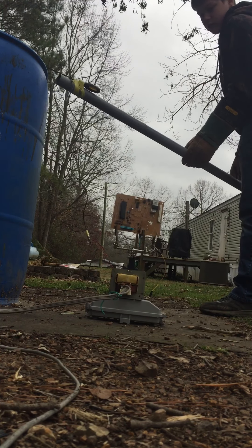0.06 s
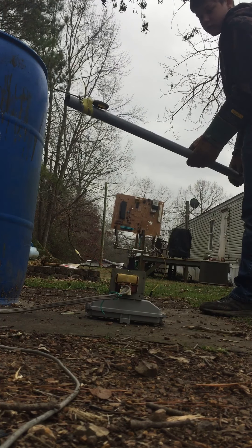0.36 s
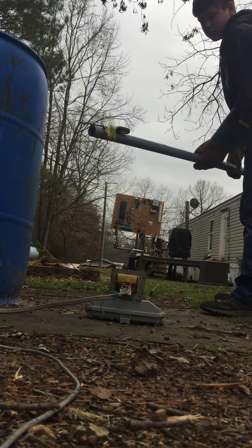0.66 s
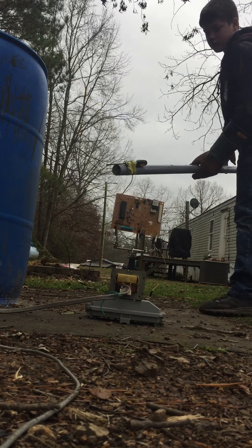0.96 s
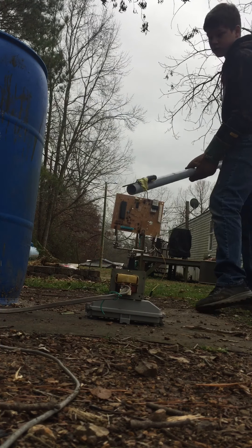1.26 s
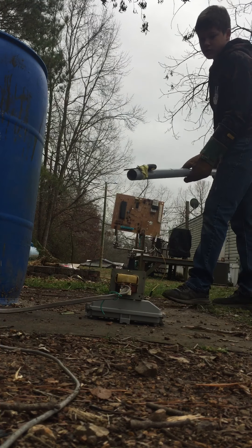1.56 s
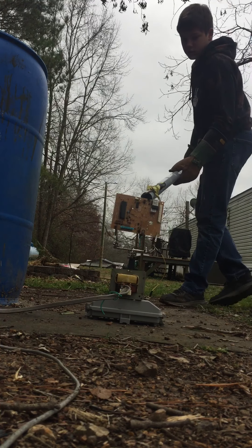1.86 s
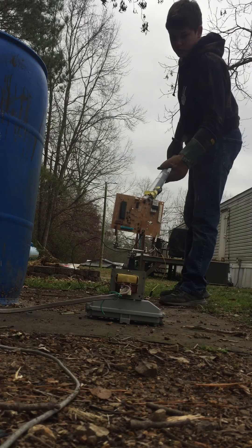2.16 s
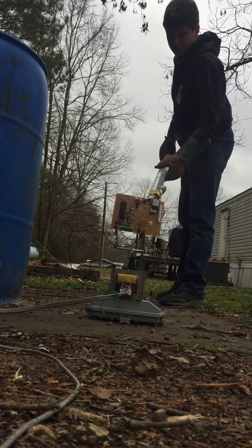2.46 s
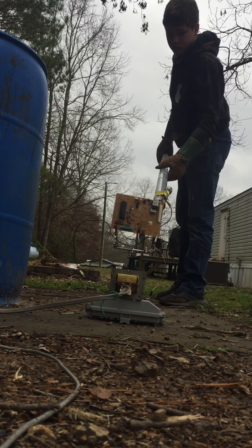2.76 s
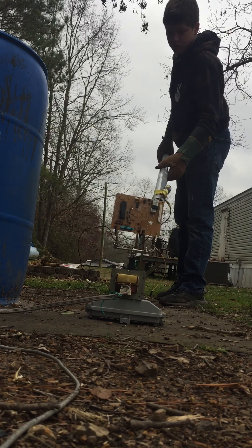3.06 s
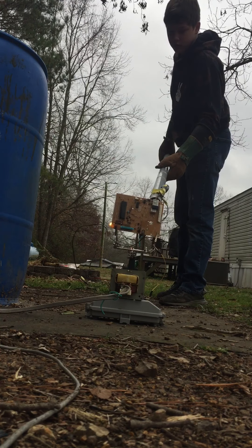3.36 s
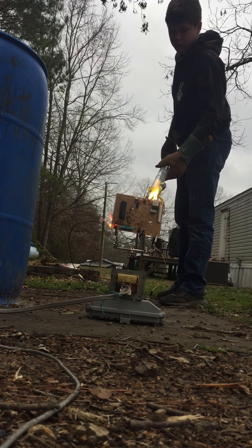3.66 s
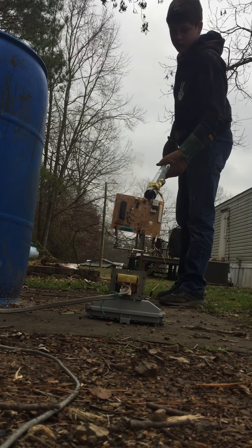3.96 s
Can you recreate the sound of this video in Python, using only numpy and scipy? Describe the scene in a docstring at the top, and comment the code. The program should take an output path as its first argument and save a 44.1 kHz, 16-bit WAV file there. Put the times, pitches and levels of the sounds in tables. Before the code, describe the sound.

A high-voltage arc snaps, sputters and grows into a harsh buzz on a circuit board near the end. Before it, a pole clacks and shoes softly knock and scuff nearby, outdoors over a faint transformer hum.

```python
"""A mains arc snaps, sputters and grows between a high-voltage electrode and a circuit board, outdoors.
It restrikes every half cycle: sudden heating radiates a crack, a push of air and a pop, the pop being
harder on one polarity. Before contact, the pole carrying the electrode clacks, shoes knock and scuff
the ground, and something twitters far off. A transformer hums throughout over a low rumble,
and the yard returns quick reflections of the nearby sounds."""
import sys
import numpy as np
from scipy import signal
from scipy.fft import rfft, irfft
from scipy.io import wavfile
from scipy.ndimage import uniform_filter1d

SR = 44100
rng = np.random.default_rng(int(sys.argv[2]) if len(sys.argv) > 2 else 0)


def to_wav(sig):
    """Store sig (one row per channel, or 1-D mono) as 16-bit WAV at the path in sys.argv[1].

    Samples outside -1..1 are clipped; the rate is SR.
    """
    pcm = np.clip(np.atleast_2d(sig), -1, 1) * 32767
    pcm = np.round(pcm).astype(np.int16)
    wavfile.write(sys.argv[1], SR, pcm.T)  # frames by channels


N = 176400
MAINS_HZ, CONTACT_S = 59.9, 3.392
HALF_CYCLE_SAMPLES = SR / (2 * MAINS_HZ)

def undb(db):
    """Amplitude ratio of a level in decibels."""
    return 10 ** (np.asarray(db) / 20)

def envelope(rows, t):
    """Amplitude interpolated in decibels; zero until just before contact."""
    return undb(np.interp(t, *np.array(rows).T)) * (t >= CONTACT_S - .001)

def colour(x, spectrum):
    """Minimum-phase filter of unit energy: the spectrum sets relative levels only."""
    hz, db = np.array(spectrum).T
    f = np.maximum(np.arange(N + 1) * SR / (2 * N), 1)
    cepstrum = irfft(np.log(undb(np.interp(np.log(f), np.log(hz), db))))
    cepstrum[1:N] *= 2  # folding onto positive time makes the filter causal
    cepstrum[N + 1:] = 0
    response = np.exp(rfft(cepstrum))
    return irfft(rfft(x, 2 * N) * response / np.sqrt(np.mean(abs(response) ** 2)))[:N]

def resonance(x, hz, q):
    """Two equal resonators in cascade, scaled to conserve the power of white noise."""
    b, a = signal.iirpeak(hz, q, fs=SR)
    return signal.lfilter(b, a, signal.lfilter(b, a, x)) / np.sqrt(b[0] / 2)

def noise():
    """Gaussian white noise."""
    return rng.standard_normal(N)

def drift(rate_hz):
    """Slow random fluctuation of unit standard deviation."""
    hold = int(SR / rate_hz)
    x = uniform_filter1d(np.repeat(rng.standard_normal(N // hold + 1), hold), hold)[:N]
    return x / x.std()

def grains(per_s, spread_db):
    """Shot noise: random impulses of log-normal size, rms 1."""
    x = (rng.random(N) < per_s / SR) * np.sign(noise()) * undb(spread_db * noise())
    return x / x.std()

def impulses(times, sizes):
    """One impulse at each time."""
    return np.bincount(np.round(times * SR).astype(int), sizes, N)[:N]

# spectra of the distant rumble and the open air (f/Hz, level/dB)
RUMBLE_SPECTRUM = [(20, -24), (65, 9), (100, 4.5), (130, 0), (165, -14.5), (300, -13), (1500, -75)]
AIR_SPECTRUM = [(100, -3), (900, 4), (1600, -4), (4000, -9.5), (8000, -15.5), (13000, -18.5), (16000, -21)]
def ambience():
    """Ambient noise: an amplitude-modulated rumble under steady, faint air."""
    rumble = colour(noise() * undb(4 * drift(rate_hz=11)), RUMBLE_SPECTRUM)
    return undb(-59) * rumble + undb(-67) * colour(noise(), AIR_SPECTRUM)

# partials of the hum (harmonic number, level/dB)
HUM_PARTIALS = [(2, -61), (4, -62.5), (6, -63)]
def transformer(t, drop_s=3.17, drop_db=-5.5):
    """Even harmonics of the mains; the level wavers and steps down shortly before contact."""
    hum = sum(undb(db) * np.sin(2 * np.pi * (k * MAINS_HZ * t + rng.random())) for k, db in HUM_PARTIALS)
    return hum * undb(.5 * drift(rate_hz=2.02) + drop_db * (t > drop_s))

# distant phrases (start t/s, end t/s, level/dB)
PHRASES = [(0.593, 0.93, -78.5), (1.76, 1.97, -74)]
def twitter(t):
    """Narrow-band noise under arched envelopes, heard as far-off birds."""
    arches = sum(undb(db) * 2 * np.sqrt(np.maximum((t - start) * (end - t), 0)) / (end - start)
                 for start, end, db in PHRASES)
    return arches * resonance(noise(), hz=4480, q=5)

# spectrum of the reflections (f/Hz, level/dB)
YARD_SPECTRUM = [(150, -29.5), (800, 4.5), (15000, -2)]
def yard(x, t, delay_s=0.0045, t60_s=0.22):
    """Reverberation: direct sound plus sparse, decaying reflections from a barrel, a wall and trees."""
    tail = grains(per_s=3700, spread_db=6) * (t > delay_s) * undb(-60 * t / t60_s)
    reflected = signal.fftconvolve(x, tail / np.linalg.norm(tail))[:N]
    return x + undb(-13.5) * colour(reflected, YARD_SPECTRUM)

# hollow knocks of shoes and pole (t/s, level/dB, f/Hz)
HOLLOW_KNOCKS = [(.721, -49.5, 704), (.859, -48, 643), (.939, -54.5, 950), (1.139, -45.5, 516),
                 (1.139, -54, 2280), (1.516, -48.5, 605), (1.745, -50.5, 816), (2.016, -37.5, 313),
                 (2.286, -41, 408), (2.296, -45.5, 940)]
def knocks(t, attack_s=0.00078, decay_s=0.0067):
    """Damped free vibration: each impact excites one mode and a weaker inharmonic overtone."""
    out = 0
    for onset, db, hz in HOLLOW_KNOCKS:
        age = np.maximum(t - onset, 0)
        shape = (1 - np.exp(-age / attack_s)) * np.exp(-np.minimum(age / decay_s, 20))
        phase = 2 * np.pi * hz * age
        out += undb(db) * shape * (np.sin(phase) + undb(-12.5) * np.sin(1.47 * phase))
    return out

# shoes on soil, twigs and leaves (t/s, thud level/dB, thud f/Hz, grit level/dB, grit f/Hz, decay t/s)
FOOTFALLS = [(1.143, -53.5, 1170, -62.5, 2220, 0.0094), (1.292, -54.5, 770, -76, 2670, 0.039),
             (1.386, -51, 710, -57, 7400, 0.026), (1.953, -67, 960, -67.5, 4030, 0.11),
             (2.009, -48.5, 508, -54.5, 4370, 0.01), (2.294, -50, 790, -71, 1500, 0.015),
             (3.113, -64, 900, -65.5, 5270, 0.0092)]
# spectrum of struck soil (f/Hz, level/dB)
SOIL_SPECTRUM = [(60, -14), (320, -8.5), (950, -13.5), (1400, -25), (6000, -60)]
def footsteps(t):
    """Impact and friction: a dull, weakly resonant thud and a scuff of grit swell and die together."""
    out, soil, grit = 0, colour(noise(), SOIL_SPECTRUM), grains(per_s=6300, spread_db=5)
    for peak_s, thud_db, thud_hz, grit_db, grit_hz, decay_s in FOOTFALLS:
        shape = np.exp(-np.minimum(abs(t - peak_s) / decay_s, 20))
        ring = resonance(shape * noise(), thud_hz, q=2.16)
        thud = (shape * soil + undb(-2) * ring) / np.sqrt(2)
        low_hz, high_hz = .3 * grit_hz, 1.7 * grit_hz
        passband = signal.butter(2, [low_hz, high_hz], "bandpass", fs=SR)
        scuff = signal.lfilter(*passband, shape * grit) * np.sqrt(SR / 2 / (high_hz - low_hz))
        out += undb(thud_db) * thud + undb(grit_db) * scuff
    return out

# impacts of the pole and its fittings (t/s, body level/dB, rattle level/dB, decay t/s)
POLE_IMPACTS = [(.375, -31, -39.5, 0.0066), (0.3868, -34.5, -53, 0.007), (0.3932, -44, -40, 0.0078),
                (.401, -29.5, -47, 0.0044), (0.4104, -32, -70, 0.0087), (.4335, -45.5, -79, 0.014)]
# spectra of the hollow body and the rattle (f/Hz, level/dB)
BODY_SPECTRUM = [(80, -6.5), (350, 0), (600, 5.5), (950, 2.5), (1250, -9), (1660, -4), (2000, -28.5),
                 (2900, -8), (4000, -32), (12000, -74)]
RATTLE_SPECTRUM = [(500, 1), (4200, -1), (5400, 5), (7500, -0.5), (8400, 0.5), (16000, -14)]
def pole(t):
    """Impact excitation: quick blows and their chatter drive hollow resonances and a bright rattle."""
    force, rattle = 0, 0
    for onset, body_db, rattle_db, decay_s in POLE_IMPACTS:
        shape = (t >= onset) * np.exp(-np.minimum(abs(t - onset) / decay_s, 20))
        blow = impulses(np.array([onset]), [np.linalg.norm(shape)])
        chatter = shape * noise()
        force += undb(body_db) * (undb(-3.5) * blow + undb(-1) * chatter)
        rattle += undb(rattle_db) * shape
    return colour(force, BODY_SPECTRUM) + colour(rattle * noise(), RATTLE_SPECTRUM)

# burning of the board (t/s, level/dB)
BURNING = [(3.39, -38.5), (3.44, -43), (3.5, -52), (3.63, -46.5), (3.72, -40.5), (3.8, -41), (3.9, -37.5),
           (4.0, -41.5)]
# spectra of its sputter and low flutter (f/Hz, level/dB)
SPUTTER_SPECTRUM = [(100, -23), (500, -30.5), (680, -1), (1100, -3), (1350, -17), (1850, -20.5),
                    (9000, -30)]
FLUTTER_SPECTRUM = [(45, -21), (100, 14.5), (400, 0.5), (3000, -59)]
def board(t):
    """Combustion noise: the board sputters in random impulses over a low flutter."""
    burning = envelope(BURNING, t)
    sputter = colour(burning * grains(per_s=900, spread_db=1.5), SPUTTER_SPECTRUM)
    flutter = colour(burning * noise(), FLUTTER_SPECTRUM)
    return undb(1.5) * sputter + undb(-5.5) * flutter

# strength of the restrike cracks, and single sparks before the arc holds (t/s, level/dB)
RESTRIKE_LEVELS = [(3.39, -46), (3.54, -48.5), (3.575, -42.5), (3.605, -48.5), (3.642, -48), (3.651, -33.5),
                   (3.715, -37.5), (3.73, -34.5), (3.9, -36), (4.0, -37)]
FIRST_SPARKS = [(3.3928, -35), (3.4, -32), (3.409, -26.5), (3.4254, -28), (3.4933, -35), (3.6244, -26.5),
                (3.641, -29.5)]
# spectra of a crack's bright edge and its body; resonances of the board (f/Hz, level/dB)
EDGE_SPECTRUM = [(1100, -18), (1900, -19), (2200, -4), (5600, 1), (6400, -5), (7400, -5.5), (8500, 2.5),
                 (10400, -6), (11300, -2.5), (12400, -5), (13700, 1), (15800, -5.5)]
CRACK_BODY_SPECTRUM = [(300, -13.5), (900, -4), (1900, -18.5), (5000, -23)]
BOARD_MODES = [(3130, -18), (4630, -26), (5350, -20), (5820, -29)]
def cracks(strike_s, change_db, decay_s=0.0036, mode_width_hz=300):
    """Electrical breakdown: sparks are decaying noise bursts that add in energy and make the board rasp."""
    strength = envelope(RESTRIKE_LEVELS, strike_s) * undb(change_db)
    spark_s, spark_db = np.array(FIRST_SPARKS).T
    energy = impulses(strike_s, strength ** 2 * HALF_CYCLE_SAMPLES * 2 / (decay_s * SR))
    energy += impulses(spark_s, undb(spark_db) ** 2)
    power = signal.lfilter([1], [1, -np.exp(-2 / (decay_s * SR))], energy)
    sparks = np.sqrt(power) * grains(per_s=9000, spread_db=1)
    rasp = sum(undb(db) * resonance(sparks, hz, hz / mode_width_hz) for hz, db in BOARD_MODES)
    return colour(sparks, EDGE_SPECTRUM) + rasp + undb(-15.5) * colour(sparks, CRACK_BODY_SPECTRUM)

# restrikes that pop extra hard (t/s, level/dB)
HARD_POPS = [(3.7418, -39.5), (3.8338, -29), (3.8925, -29)]
# spectrum of a pop (f/Hz, level/dB)
POP_SPECTRUM = [(50, -57), (180, -1), (300, -1.5), (420, -0.5), (475, -19), (540, -0.5), (670, 5.5),
                (950, 1), (1380, -15.5), (1580, -10), (1950, -35.5), (3200, -20), (15000, -89)]
def pops(flare_s, flame, change_db, weak_polarity_db=-31, lead_s=0.00072):
    """Polarity asymmetry: every other pop is weak, so the pulses repeat at the mains frequency."""
    polarity_db = weak_polarity_db * (np.arange(len(flare_s)) % 2)
    size = flame * np.sqrt(2) * undb(change_db + polarity_db)
    size *= (flame / undb(-29.5)) ** 0.34  # a bigger flame pops disproportionately harder
    for time_s, db in HARD_POPS:
        size[np.argmin(abs(flare_s - time_s))] += undb(db)
    return -colour(impulses(flare_s - lead_s, size * np.sqrt(HALF_CYCLE_SAMPLES)), POP_SPECTRUM)

# spectrum of a push of hot air (f/Hz, level/dB)
PUSH_SPECTRUM = [(40, -19), (75, -2), (120, 11), (290, 1.5), (420, -12), (475, -6.5), (600, 1.5),
                 (6000, -60.5)]
def air_pushes(flare_s, flame):
    """Thermal expansion: each flare displaces air and radiates a low pressure pulse."""
    return colour(impulses(flare_s, flame * np.sqrt(HALF_CYCLE_SAMPLES)), PUSH_SPECTRUM)

# strength of the arc flame (t/s, level/dB)
FLAME_LEVELS = [(3.39, -40.5), (3.45, -47.5), (3.65, -53.5), (3.745, -34), (3.83, -27), (3.89, -28),
                (3.94, -29.5), (4.0, -27.5)]
# spells of smooth burning that weaken the cracks (start t/s, end t/s, change of level/dB)
SMOOTH_SPELLS = [(3.764, 3.788, -10), (3.839, 3.855, -59)]
def arc(jitter_s=0.0004, crack_scatter_db=1.8):
    """An alternating-current arc restrikes every half cycle, each time with a crack, a push and a pop."""
    count = int((N / SR - CONTACT_S) * 2 * MAINS_HZ) + 1
    timing, scatter = rng.standard_normal((count, 2)).T
    beat_s = CONTACT_S + np.arange(count) / (2 * MAINS_HZ)
    strike_s = beat_s + jitter_s * timing
    flare_s = beat_s + .4 * jitter_s * timing  # the low pulses keep steadier time
    lull_db = sum(db * ((strike_s > start) & (strike_s < end)) for start, end, db in SMOOTH_SPELLS)
    flame = envelope(FLAME_LEVELS, strike_s)
    crack = cracks(strike_s, lull_db + crack_scatter_db * scatter)
    pop = pops(flare_s, flame, 0.11 * lull_db)  # the pops dip only slightly in a lull
    return undb(-2) * crack + undb(-3.5) * air_pushes(flare_s, flame) + undb(-1.5) * pop

def scene():
    """Superposition: the nearby sources and their reflections add to the background, in mono."""
    t = np.arange(N) / SR
    nearby = arc() + board(t) + pole(t) + footsteps(t) + knocks(t)
    return (yard(nearby, t) + twitter(t) + transformer(t) + ambience())[None]

def record(dry, cutoff_hz=15900):
    """Band limiting: a steep low-pass filter removes the highest treble."""
    return signal.sosfilt(signal.ellip(10, .2, 80, cutoff_hz, fs=SR, output="sos"), dry)

dry = scene()
out = record(dry)
to_wav(out)
```